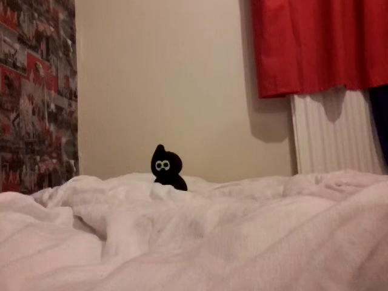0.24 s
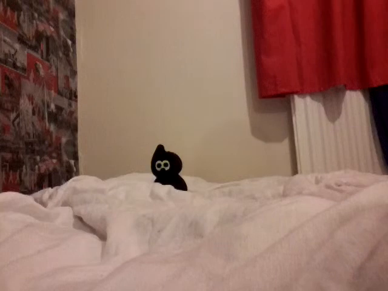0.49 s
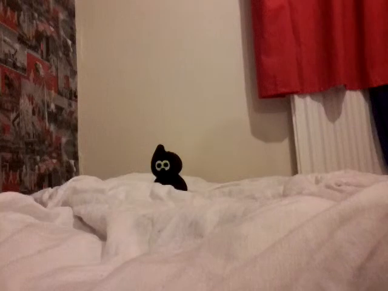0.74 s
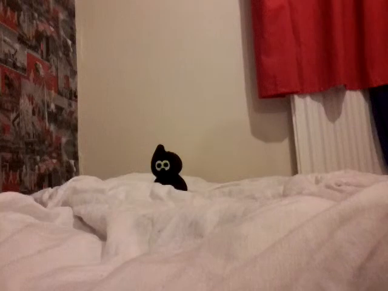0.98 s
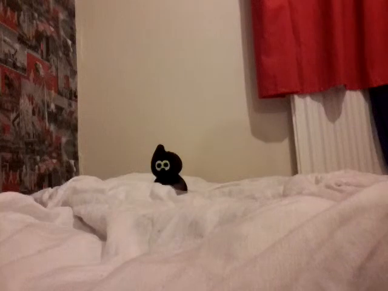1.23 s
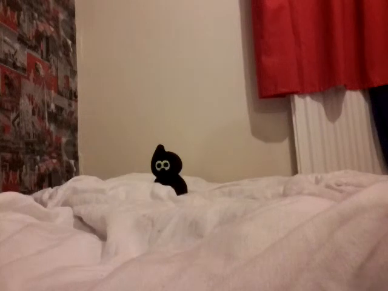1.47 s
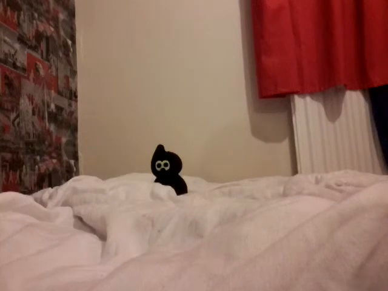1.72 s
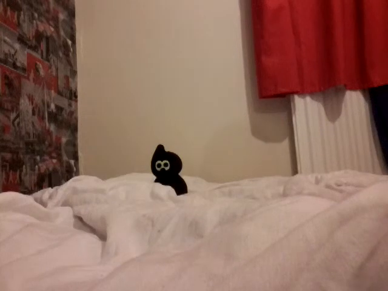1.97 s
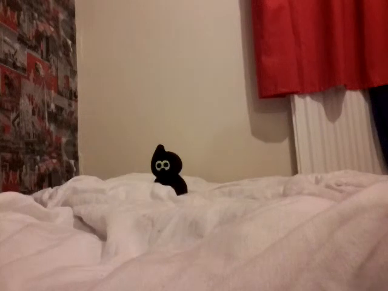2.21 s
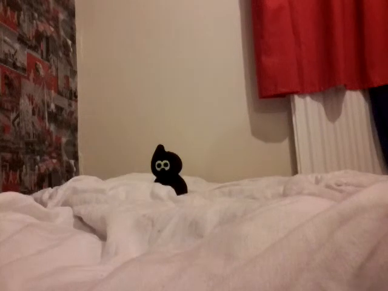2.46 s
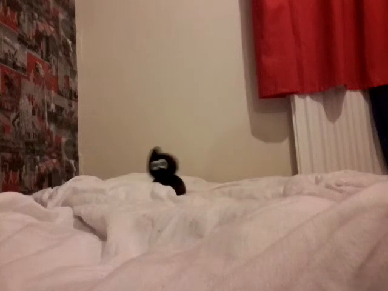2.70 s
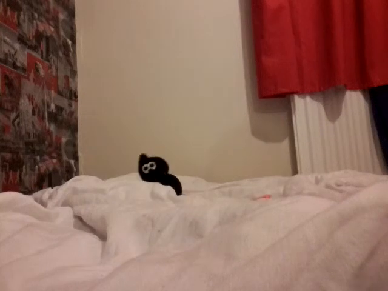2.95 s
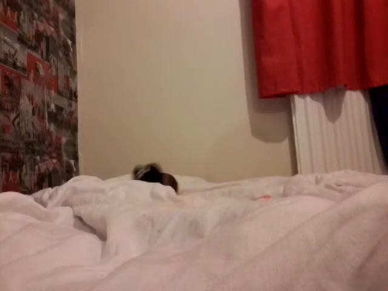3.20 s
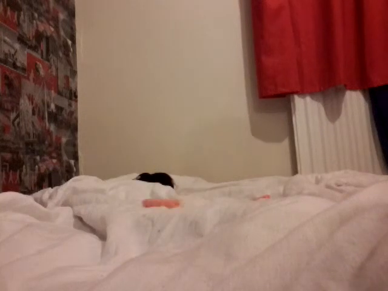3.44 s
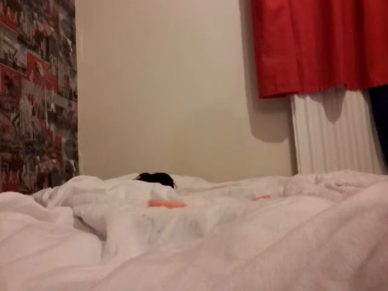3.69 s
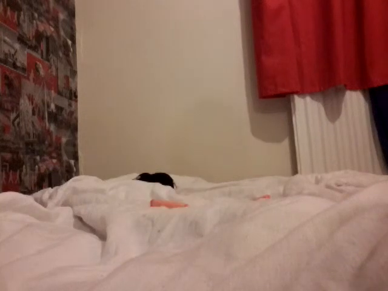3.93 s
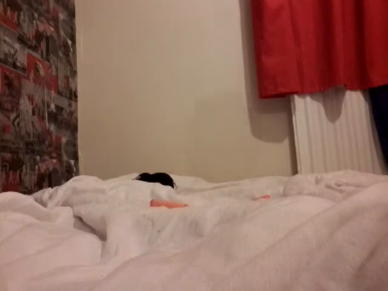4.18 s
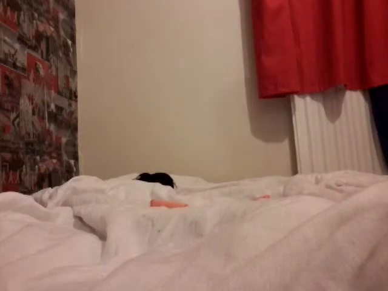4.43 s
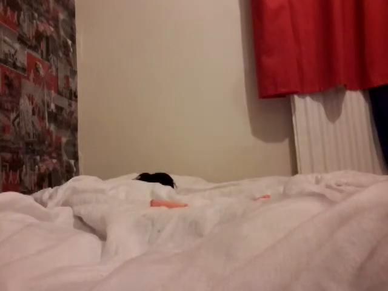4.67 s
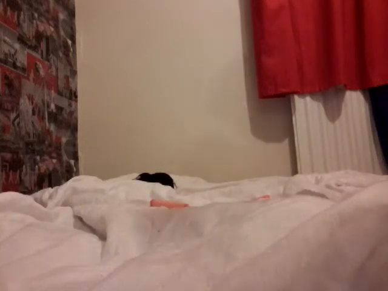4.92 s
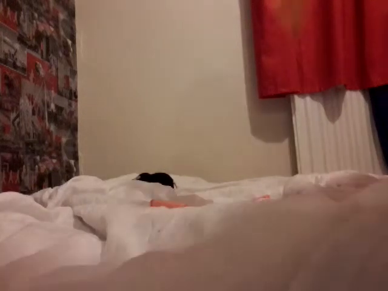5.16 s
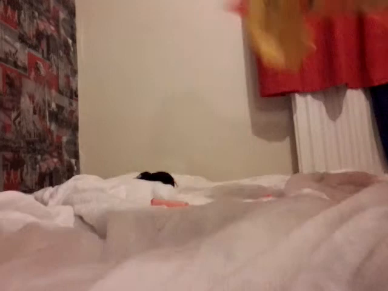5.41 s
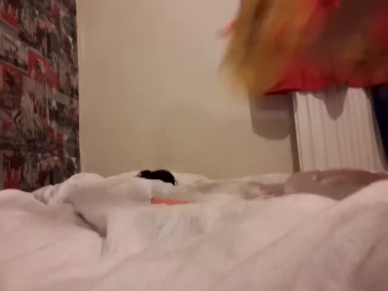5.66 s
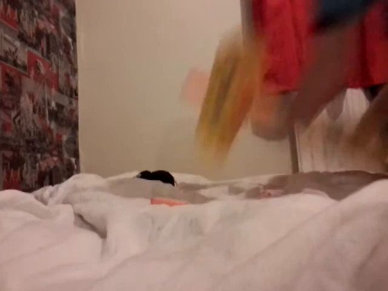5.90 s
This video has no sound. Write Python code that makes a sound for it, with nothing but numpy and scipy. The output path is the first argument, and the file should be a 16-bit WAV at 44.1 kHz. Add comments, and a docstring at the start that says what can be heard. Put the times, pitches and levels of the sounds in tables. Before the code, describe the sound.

Close, harsh plastic gear whine and popping slams, once and then three times rapidly, in a small bedroom, before soft bedding rustles and sharp ticks.

```python
"""Toy dart blaster in a bedroom

A motor-driven toy blaster fires four foam darts close to a camera with two microphone ports.
Each cycle the gears catch the plunger and whine lower as the spring loads; then the plunger slams and rattles.
Blows and gears are shaped noise, partly rung through shell modes; whine, growl and barrel pops are sines.
Hands shift the plastic toy: noise-burst ticks and knocks. Grainy swish and rumble are cloth rustle
and the late hissing room tail after the shots, over microphone hiss."""
import sys
import numpy as np
from scipy import signal
from scipy.fft import rfft, irfft, next_fast_len
from scipy.io import wavfile
from scipy.ndimage import uniform_filter1d

SR = 44100
rng = np.random.default_rng(int(sys.argv[2]) if len(sys.argv) > 2 else 0)


def transcribe(u):
    """Save the signal u as a 16-bit wav file named by the first command-line argument.

    u: samples, shape (n,) or (channels, n), limited to [-1, 1]; the rate is SR.
    q: integer samples, one column per channel.
    """
    v = np.clip(np.atleast_2d(u).T, -1, 1)
    q = np.round(v * 32767).astype(np.int16)
    wavfile.write(sys.argv[1], SR, q)


N = 268701

# gears catch the plunger, once per dart: [t/s, relative level/dB, starting whine f/Hz]
CATCH_EVENTS = [(.9255, -0.5, 2787), (2.2823, -2, 2720), (2.7006, -4, 2952), (3.093, -6, 2900)]
# released plunger slams forward: [t/s, relative level/dB]
SLAM_EVENTS = [(1.1468, 0.5), (2.522, 0.5), (2.9169, 1), (3.3155, -0.5)]

# gear grind with the plunger free, just caught, and with the spring fully loaded
GRIND_FREE_DB, GRIND_CAUGHT_DB, GRIND_LOADED_DB = -35.5, -32, -27


def amp(db):
    """Logarithmic level: decibels to amplitude gain."""
    return 10 ** (np.asarray(db) / 20)


def evened(x):
    """Power normalisation: scales to rms 1."""
    return x / np.sqrt(np.mean(x ** 2) + 1e-20)


def read(points, hz):
    """Interpolation on a log-frequency axis, the scale on which pitch is heard."""
    f, value = np.transpose(points)
    return np.interp(np.log(hz + 1), np.log(f + 1), value)


def levels(tables, column):
    """Amplitude envelope: gain linear in decibels between points, silent outside the tables."""
    t, out = np.arange(N) / SR, np.zeros(N)
    for rows in map(np.array, tables):
        out += amp(np.interp(t, rows[:, 0], rows[:, column], -200, -200))
    return uniform_filter1d(out, 300)


def coloured(x, points):
    """Minimum-phase filtering: causal response with the given spectrum and unit energy."""
    hz = abs(np.fft.fftfreq(4096, 1 / SR))
    log_gain = np.log(amp(np.maximum(read(points, hz), -100)))
    # the Hilbert transform of the log gain supplies the minimum phase
    taps = np.fft.ifft(np.exp(np.conj(signal.hilbert(log_gain)))).real[:2048]
    taps = taps[None] / np.linalg.norm(taps)
    return signal.oaconvolve(np.atleast_2d(x), taps, axes=1)[:, :N].reshape(x.shape)


def grains(shape, spread_db):
    """Granular noise: strength jumps from one tiny grain to the next."""
    grain = uniform_filter1d(rng.standard_normal(shape), 12, -1) * np.sqrt(12)
    return evened(amp(spread_db * grain) * rng.standard_normal(shape))


def bursts(times, level_db, lengths, rise):
    """Impact decay: each blow is a chatter of contacts dying exponentially over its length."""
    out, t = np.zeros(N + 4000), np.arange(4000) / SR
    chatter = grains((len(times), 4000), spread_db=6.0)
    for s, db, length, noise in np.broadcast(times, level_db, lengths, np.arange(len(times))):
        shape = (1 - np.exp(-t / rise)) * np.exp(-t / max(length, .0004))
        blow = shape * chatter[noise]
        # the draw of noise does not alter the energy of the blow
        blow = blow * np.linalg.norm(shape) / np.linalg.norm(blow)
        out[round(s * SR):][:4000] += amp(db) * blow
    return out[:N]


def alike_pair(left, other):
    """Diffuse-field coherence: how much two ports share depends on frequency."""
    # likeness of the two ports: [f/Hz, likeness 0-1]
    likeness = [(60, 0.9), (150, 0.6), (400, 0.7), (1000, 0.89), (2500, 0), (6000, .05)]
    size = left.shape[-1]
    c = np.clip(read(likeness, np.fft.rfftfreq(size, 1 / SR)), 0, 1)
    return np.array([left, irfft(c * rfft(left) + np.sqrt(1 - c ** 2) * rfft(other), size)])


def swish_and_rumble():
    """Diffuse noise under envelopes: cloth rustle, and the late hissing room tail after the shots."""
    # swish and rumble over time: [t/s, swish level/dB, rumble level/dB]
    swells = [
        [(0, -81.5, -64), (.07, -64.5, -54), (.14, -62.5, -57.5), (.33, -87, -73)],
        [(1.4, -71, -67), (1.52, -63, -59.5), (1.86, -79, -68), (2.1, -68, -63.5)],
        [(3.55, -64, -64.5), (3.68, -59.5, -58.5), (3.85, -68, -66), (4.1, -65.5, -62.5), (4.25, -76.5, -68),
         (4.36, -59, -60), (4.53, -60.5, -58), (4.82, -71, -68), (5.08, -64, -55), (5.4, -63.5, -66),
         (5.65, -74, -61), (6.09, -60, -63.5)],
    ]
    # spectrum of the swish: [f/Hz, spectral level/dB per Hz]
    swish_colour = [(700, -25), (1500, -2.5), (3000, -6.5), (5500, -1.5), (9000, -13.5), (14000, -18)]
    # spectrum of the rumble: [f/Hz, spectral level/dB per Hz]
    rumble_colour = [(30, -13.5), (80, -2.5), (200, -2), (500, -13.5), (1200, -24), (3000, -44.5)]
    swish = levels(swells, column=1) * coloured(grains((2, N), spread_db=3.5), swish_colour)
    lumps = amp(2.5 * evened(uniform_filter1d(rng.standard_normal(N), 1500)))
    rumble = coloured(rng.standard_normal((2, N)), rumble_colour)
    return alike_pair(*(swish + levels(swells, column=2) * lumps * rumble))


def handling():
    """Impact spectra: short contacts of plastic give light ticks, longer ones dull knocks on the bed."""
    # handling of toy and bedding: [t/s, tick level/dB, knock level/dB, tick decay/s]
    touches = [(0.064, -52, -68, .008), (2.055, -49.5, -45.5, 0.0043), (2.0685, -52.5, -45, .006),
               (3.89, -59.5, -40.5, 0.0028), (3.909, -61, -49.5, .008), (3.928, -53.5, -49, 0.0071),
               (4.0793, -60.5, -53, .008), (4.113, -51, -41, 0.0055), (4.32, -60, -50.5, 0.007),
               (4.3387, -50.5, -34.5, .005), (4.3471, -44, -35, 0.0046), (4.3704, -56.5, -42, .004),
               (4.3804, -54, -41.5, .005), (4.4246, -51.5, -37, 0.0063), (4.57, -52, -41, .004),
               (4.588, -50.5, -41.5, 0.0057), (4.747, -52.5, -53.5, 0.00305),
               (4.8863, -42.5, -48.5, 0.0023), (4.923, -42.5, -54.5, .004), (4.9595, -33, -56.5, .0015),
               (4.971, -48, -50, .003), (5.0963, -54.5, -42.5, 0.0034), (5.261, -55.5, -65.5, 0.00405),
               (5.3832, -47, -49.5, 0.00535), (5.5064, -31.5, -50.5, 0.0016), (5.688, -60, -46.5, .004),
               (5.7122, -36, -63, 0.0012), (5.9175, -35, -58, 0.0011), (6.009, -36, -51.5, 0.001)]
    # spectrum of light plastic ticks: [f/Hz, spectral level/dB per Hz]
    tick_colour = [(600, -26.5), (1200, -14.5), (2000, -8), (3400, -4.5), (4500, -5.5), (6700, -6),
                   (10000, -16), (14600, -31.5)]
    # spectrum of dull knocks: [f/Hz, spectral level/dB per Hz]
    knock_colour = [(120, -42.5), (250, -10.5), (480, -2), (750, -7), (1100, -11), (1700, -16.5),
                    (3000, -19.5), (6000, -43.5)]
    knock_stretch = 1.4  # a knock outlasts its tick
    s, tick_db, knock_db, length = np.transpose(touches)
    ticks = coloured(bursts(s, tick_db, length, rise=0.00019), tick_colour)
    knocks = coloured(bursts(s, knock_db, knock_stretch * length, rise=0.0016), knock_colour)
    return ticks + knocks


def motor():
    """Run-up: gain of the motor, and its speed rising from 0 to 1 and held until the next start."""
    # trigger held down: [motor on t/s, motor off t/s]
    holds = [(.803, 1.24), (2.164, 3.42)]
    spin_up_s, switch_s, coast_db_per_s = .115, 0.013, -350
    t, running, speed = np.arange(N) / SR, np.zeros(N), np.zeros(N)
    for on, off in holds:
        coasting = amp(coast_db_per_s * np.maximum(t - off, 0))
        running += np.clip((t - on) / switch_s, 0, 1) * coasting
        speed = np.where(t > on, np.minimum((t - on) / spin_up_s, 1), speed)
    return running, speed


def turning(hz, uneven):
    """Phase integration: a rotating part with uneven teeth follows the given pitch."""
    wobble = 1 + uneven * evened(uniform_filter1d(rng.standard_normal(N), 200))
    return 2 * np.pi * np.cumsum(hz * wobble) / SR


def gear_grind(running, speed, extra_db):
    """Mesh noise: gear teeth grind louder with speed and with load."""
    # spectrum of the gear noise: [f/Hz, spectral level/dB per Hz]
    grind_colour = [(800, -31), (1300, -11), (1900, -6), (2600, -2), (3800, -6.5), (5200, -3.5),
                    (7500, -10), (10500, -21), (13300, -30), (14700, -50)]
    start_db = -50
    grind_db = start_db + (GRIND_FREE_DB - start_db) * speed ** 0.68 + extra_db
    return coloured(running * amp(grind_db) * grains(N, spread_db=0.5), grind_colour)


def housing_drone(running, speed, extra_db):
    """Structure-borne sound: noise from the drive that will excite the hollow shell."""
    start_db, free_db, loaded_db = -45, -34, -36.5
    load = extra_db / (GRIND_LOADED_DB - GRIND_FREE_DB)
    drone_db = start_db + (free_db - start_db) * speed + (loaded_db - free_db) * load
    return running * amp(drone_db) * grains(N, spread_db=2.4)


def spin_up_growl(running, speed):
    """Rotational tone: pitch and level rise with motor speed, ending at full speed."""
    start_hz, free_hz, start_db, free_db = 531, 810, -53, -40
    spin = turning(start_hz + (free_hz - start_hz) * speed, uneven=0.018)
    growl = np.sin(spin) + amp(-5.0) * np.sin(1.5 * spin)
    gain = running * (speed < 1) * amp(start_db + (free_db - start_db) * speed)
    return uniform_filter1d(gain, 300) * growl


def blows():
    """Repeatable mechanism: each cycle has the same blows, at its own moments and strengths."""
    # loose parts run home: [t/s, relative level/dB]
    homings = [(1.205, 1.5), (2.589, 0.5), (2.982, -1.5), (3.38, -0.5)]
    # blows as the plunger is caught: [t after the moment/s, rattle level/dB, hollow level/dB, rattle decay/s]
    catch_blows = [(-.001, -4.5, -13.5, .004), (.005, -7.5, -9.5, .0075), (0.016, -11.5, -20, .007),
                   (0.029, -14.5, -21, .007)]
    # blows of the slam: [t after the moment/s, rattle level/dB, hollow level/dB, rattle decay/s]
    slam_blows = [(-.008, -15.5, -21, .008), (0, -8.5, -2, 0.0045), (.004, -14, -4.5, .004),
                  (.009, -13.5, -16.5, .007), (.032, -10.5, -17.5, .0065), (.041, -9.5, -22.5, .009)]
    # blows of parts running home: [t after the moment/s, rattle level/dB, hollow level/dB, rattle decay/s]
    home_blows = [(0, -9.5, -10, .009), (.012, -7, -13.5, 0.0083), (.022, -9.5, -17.5, .007),
                  (.03, -12.5, -24.5, .0065)]
    rows = []
    for moments, pattern in [(CATCH_EVENTS, catch_blows), (SLAM_EVENTS, slam_blows), (homings, home_blows)]:
        for s, db, *_ in moments:
            for after, rattle_db, push_db, length in pattern:
                rows.append((s + after, db + rattle_db, db + push_db, length))
    return np.array(rows).T


def spring():
    """Elastic load: drawing the spring adds grind and lowers the tooth whine; also the whine gain."""
    end_hz, sag_bend = 1968, 1.75
    whine_db, whine_fall_db, fade_s = -33.5, -3.5, 0.045
    unload_s = .17  # gears quieten over this time after the slam
    load_db = [GRIND_CAUGHT_DB - GRIND_FREE_DB, GRIND_LOADED_DB - GRIND_FREE_DB, 0]
    t, extra_db, gain = np.arange(N) / SR, np.zeros(N), np.zeros(N)
    hz = np.full(N, float(end_hz))
    for (catch, _, top_hz), (slam, _) in zip(CATCH_EVENTS, SLAM_EVENTS):
        pulling = (t >= catch) & (t < slam)
        share = np.clip((t - catch) / (slam - catch), 0, 1)  # of the draw completed
        extra_db += np.interp(t, [catch, slam, slam + unload_s], load_db, 0, 0)
        hz += pulling * (top_hz - end_hz) * (1 - share ** sag_bend)
        fade_in = np.clip((t - catch) / fade_s, 0, 1) ** 2
        gain += pulling * amp(whine_db + whine_fall_db * share ** 2) * fade_in
    return extra_db, hz, uniform_filter1d(gain, 300)


def tooth_whine(hz, gain):
    """Gear-mesh tone: partials locked to the tooth rate, throbbing with rotation."""
    turn = turning(hz, uneven=.005)
    throb = 1 + 0.4 * np.sin(turn / 16)  # once a turn of the pinion
    tone = np.sin(turn) + amp(-11.0) * np.sin(2 * turn)
    tone += amp(-11.0) * np.sin(1.1 * turn) + amp(-11.5) * np.sin(.42 * turn)
    return gain * throb * tone


def hollow(x):
    """Modal resonance: any push rings the shell's low modes; a small shell radiates no deep bass."""
    # air and wall modes of the shell, two thin rings of the spring: [f/Hz, bandwidth/Hz, level/dB]
    modes = [(437, 130, -10.5), (479, 3.9, -33.5), (573, 540, -5.5), (796, 190, 4), (1113, 220, 1.5),
             (1390, 370, -4), (2670, 9, -39.5)]
    low_cut_hz = 316
    t = np.arange(SR // 2) / SR
    ring = sum(amp(db) * np.exp(-np.pi * w * t) * np.sin(2 * np.pi * hz * t) for hz, w, db in modes)
    rung = signal.oaconvolve(x, ring / np.linalg.norm(ring))[:N]
    return signal.sosfilt(signal.butter(3, low_cut_hz, "high", fs=SR, output="sos"), rung)


def blaster():
    """Source superposition: body noise of blows and gears, and the motor's tones apart."""
    # spectrum of small plastic parts: [f/Hz, spectral level/dB per Hz]
    rattle_colour = [(800, -24.5), (1300, -6.5), (2000, -6.5), (2900, -3), (4300, -6), (5100, 1),
                     (6000, -0.5), (8000, -9), (10500, -16), (13500, -27), (14700, -39)]
    push_share = 0.46  # the hollow push lasts this share of the rattle
    s, rattle_db, push_db, length = blows()
    running, speed = motor()
    extra_db, whine_hz, whine_gain = spring()
    rattle = coloured(bursts(s, rattle_db, length, rise=0.0012), rattle_colour)
    grind = gear_grind(running, speed, extra_db)
    push = bursts(s, push_db, push_share * length, rise=0.0003)
    push += housing_drone(running, speed, extra_db)
    tones = spin_up_growl(running, speed) + tooth_whine(whine_hz, whine_gain)
    return rattle + grind + hollow(push), np.sqrt(2) * tones  # a sine of amplitude sqrt(2) has rms 1


def pops():
    """Air-column resonance: the slam puffs air; the barrel rings a few cycles, then dies as the dart leaves."""
    # air slammed out of the barrel behind each dart: [t/s, level before the low cut/dB, f/Hz]
    barrel_pops = [(1.149, -7.5, 778), (2.5325, -6.5, 774), (2.9275, -4, 774), (3.3245, -7, 840)]
    pop_cycles, puff_db, puff_s = 3.6, -24, .0007
    out, t = np.zeros(N), np.arange(1500) / SR
    for (slam, slam_db), (s, db, hz) in zip(SLAM_EVENTS, barrel_pops):
        cycles = t * hz
        shape = np.minimum(cycles / 0.7, 1) * np.exp(-np.maximum(cycles - pop_cycles, 0) / 0.9)
        out[round(s * SR):][:1500] += amp(db) * shape * np.sin(2 * np.pi * hz * t)
        puff = t / puff_s * np.exp(1 - t / puff_s)
        out[round(slam * SR):][:1500] += amp(puff_db + slam_db) * puff
    # a small muzzle radiates no deep bass
    return signal.sosfilt(signal.butter(2, 110, "high", fs=SR, output="sos"), out)


def echoes(x, first, decays):
    """Reverberation: sparse echoes of random sign from sample first on, each band with its own decay."""
    turn_hz = 5.3  # three random echo patterns fade into one another, so no fixed bands stand out
    out, turn = np.zeros((2, N)), 2 * np.pi * turn_hz * np.arange(N) / SR
    for k in range(3):
        taps = np.zeros((2, 30000))
        at = np.arange(first, 29900, 12)
        at = at + rng.integers(0, 12, (2, len(at)))
        np.put_along_axis(taps, at, rng.choice([-1., 1.], at.shape), 1)
        hz, t, z = signal.stft(alike_pair(*taps), SR, nperseg=128)
        decay = amp(-60 * t / read(decays, hz)[:, None])
        tail = signal.istft(z * decay, SR, nperseg=128)[1]
        tail = tail / np.linalg.norm(tail, axis=1, keepdims=True)
        share = np.sqrt(2 / 3) * np.cos(turn + k * np.pi / 3)  # the three powers sum to 1
        out += signal.oaconvolve((share * x)[None], tail, axes=1)[:, :N]
    return out


def scene():
    """Directivity: muzzle and motor tones face the camera and come drier than the body sound."""
    # scatter off the arms, bed and wall close by: [f/Hz, t60/s]
    nearby = [(300, 0.047), (1500, 0.09), (8000, 0.065)]
    # reverberation of the room: [f/Hz, t60/s]
    room = [(100, 0.19), (300, .42), (700, 0.35), (2000, 0.35), (5000, 0.37), (8000, 0.41), (13000, 0.25)]
    body, tones = blaster()
    facing = pops() + tones
    near = body + handling() + amp(-7.5) * facing
    scatter = amp(-0.5) * echoes(near, 24, nearby)
    tail = amp(-6.5) * echoes(near, 400, room)
    return facing + amp(-3.5) * near + scatter + tail + swish_and_rumble()


def record(dry):
    """Two-port reception: level, delay and phase between ports, then hiss, overload and band limit."""
    # level of left over right: [f/Hz, level/dB]
    port_level = [(60, 0), (200, 5), (400, 0), (700, 3.5), (1300, 6.5), (2300, 6.5), (4200, 0), (7700, 7),
                  (14000, 8)]
    # phase of left over right, the bass nearly opposite: [f/Hz, phase/rad]
    port_phase = [(200, -3), (340, -3.5), (780, -0.98), (1460, -2.5), (3100, -3), (7500, 1.8)]
    # spectrum of the microphone noise: [f/Hz, spectral level/dB per Hz]
    hiss_colour = [(15, -28), (30, -17), (60, -3.5), (100, -5.5), (200, -9), (600, -21), (2200, -25.5),
                   (14600, -26.5)]
    hiss_db, edge_hz = -62.5, 14800
    lag_s = .00043  # the blaster is nearer the left port
    size = next_fast_len(N + 4096)
    hz = np.fft.rfftfreq(size, 1 / SR)
    # each port takes half of the difference
    half = amp(read(port_level, hz) / 2) * np.exp(.5j * read(port_phase, hz))
    late = np.exp(-2j * np.pi * hz * lag_s)
    hiss = amp(hiss_db) * evened(coloured(rng.standard_normal((2, N)), hiss_colour))
    ports = irfft(rfft(dry, size) * np.array([half, late / half]), size)[:, :N] + hiss
    clipped = np.clip(ports, -1, 1)
    band_limit = signal.firwin(511, edge_hz, window=("kaiser", 9), fs=SR)
    return signal.oaconvolve(clipped, band_limit[None], "same")


dry = scene()
out = record(dry)
transcribe(out)
```